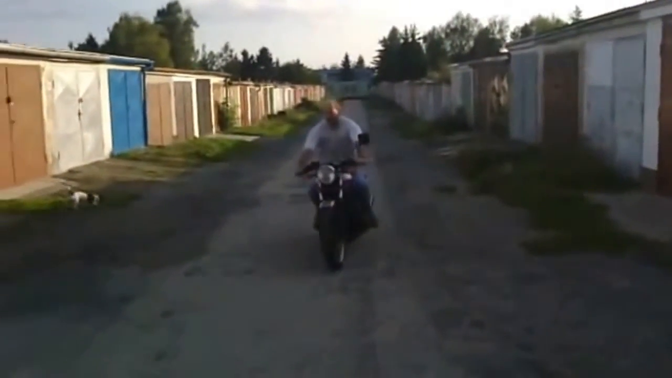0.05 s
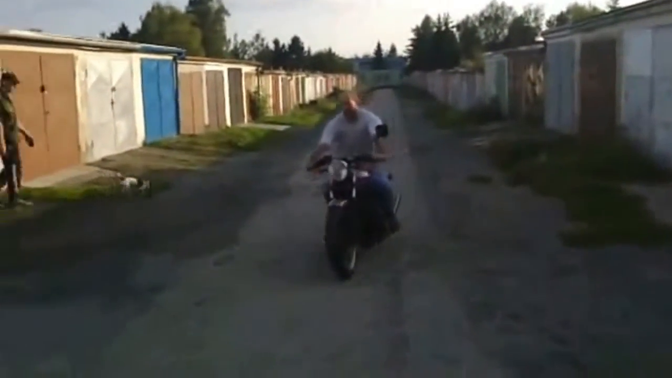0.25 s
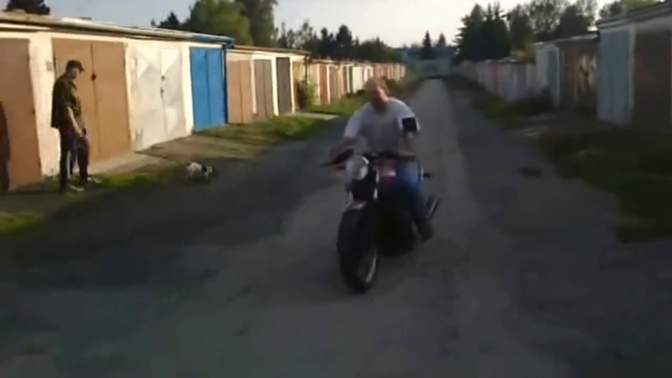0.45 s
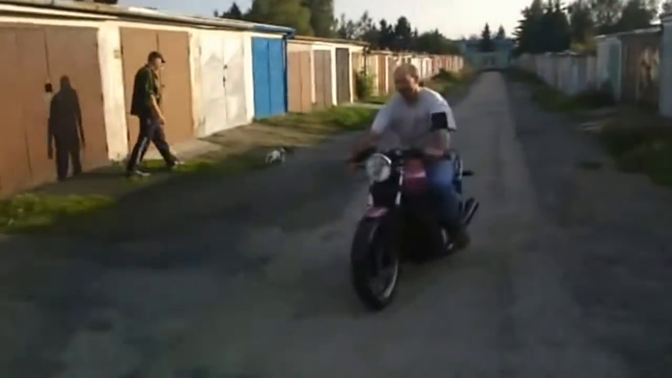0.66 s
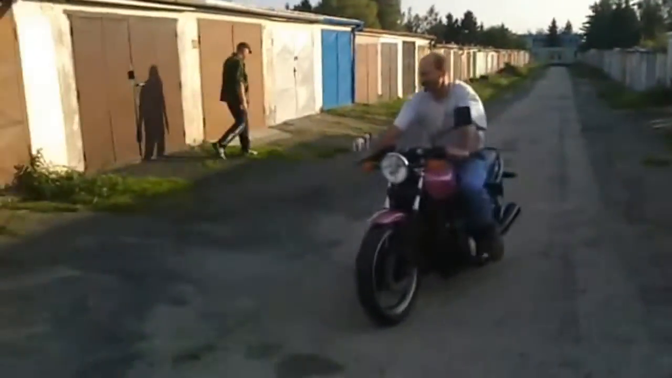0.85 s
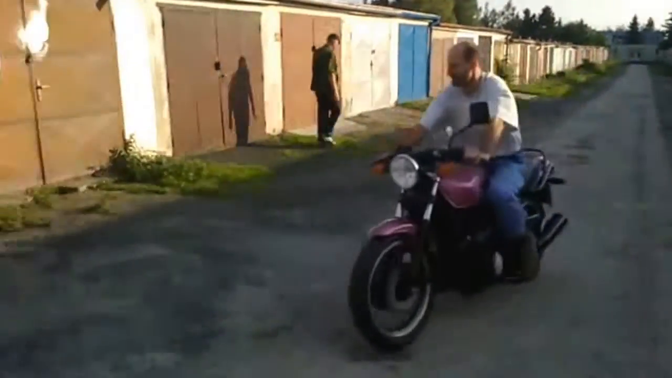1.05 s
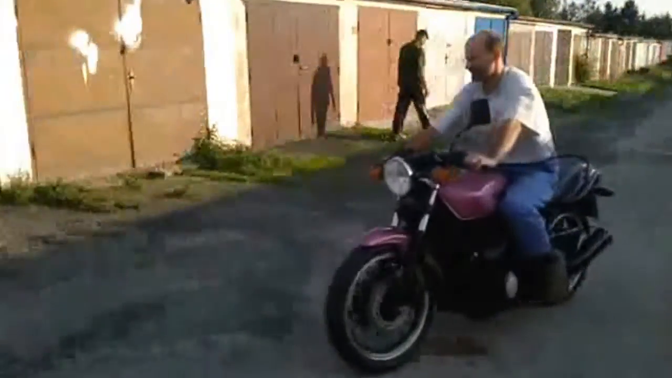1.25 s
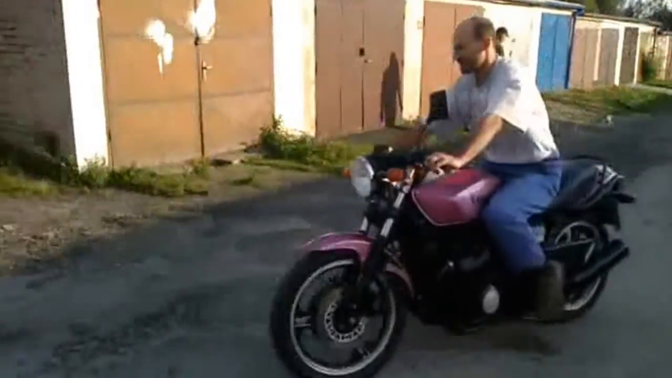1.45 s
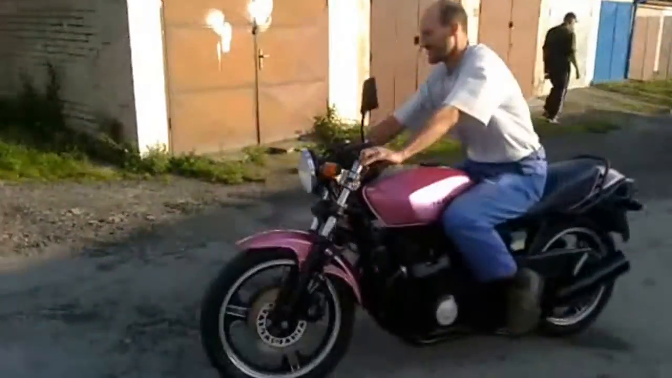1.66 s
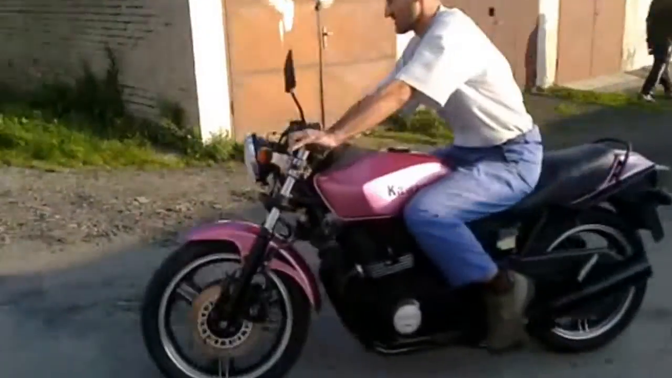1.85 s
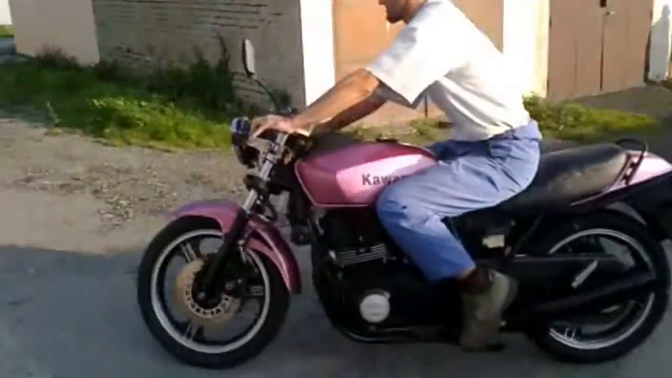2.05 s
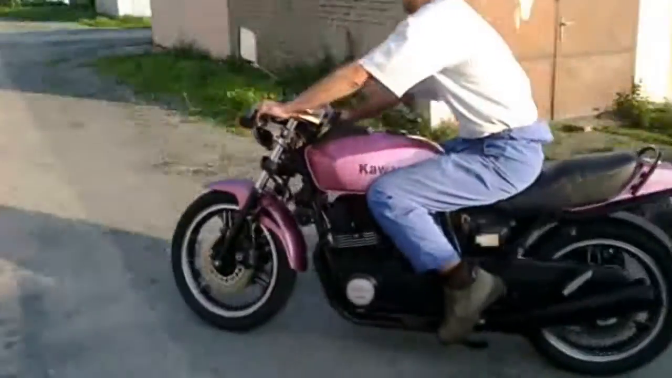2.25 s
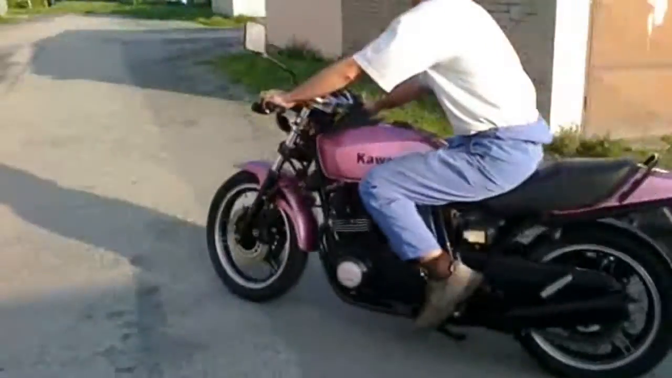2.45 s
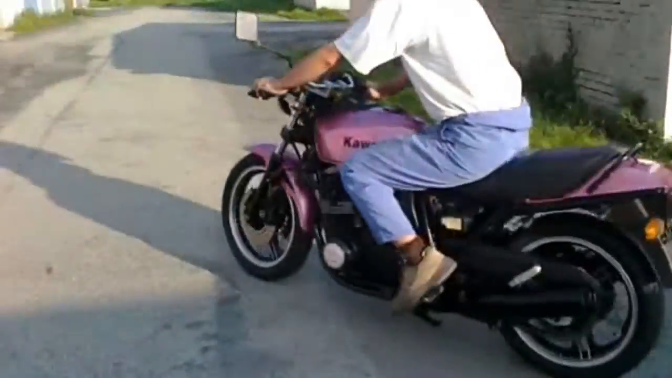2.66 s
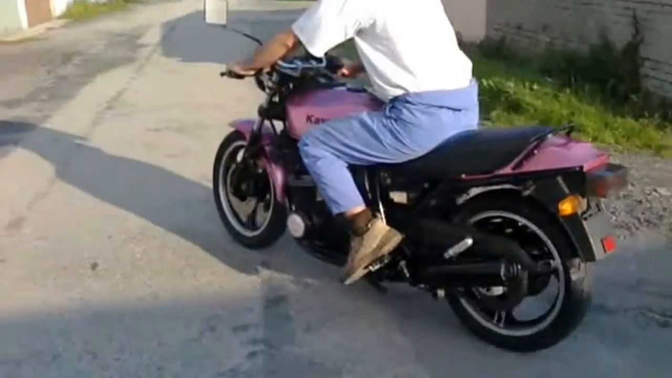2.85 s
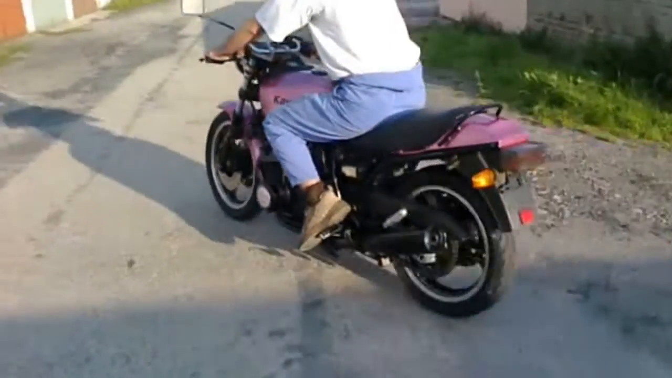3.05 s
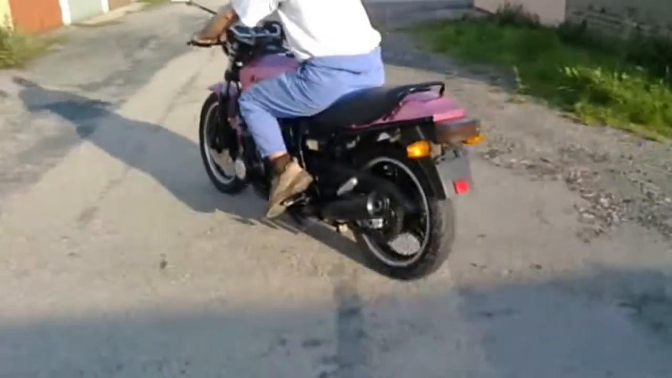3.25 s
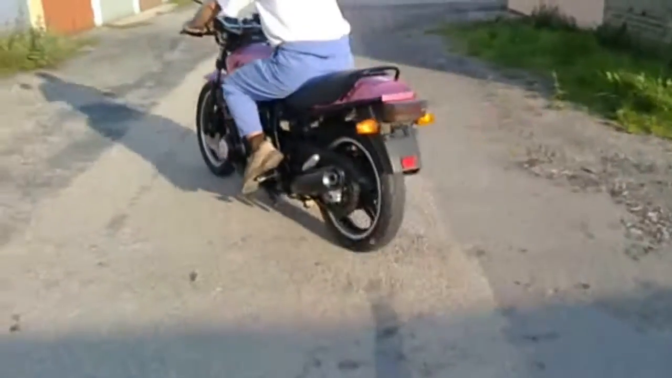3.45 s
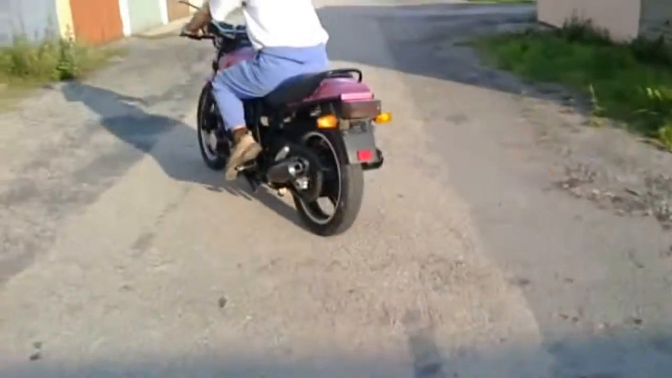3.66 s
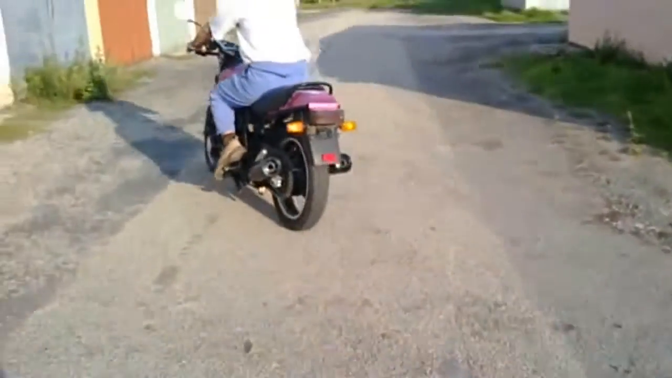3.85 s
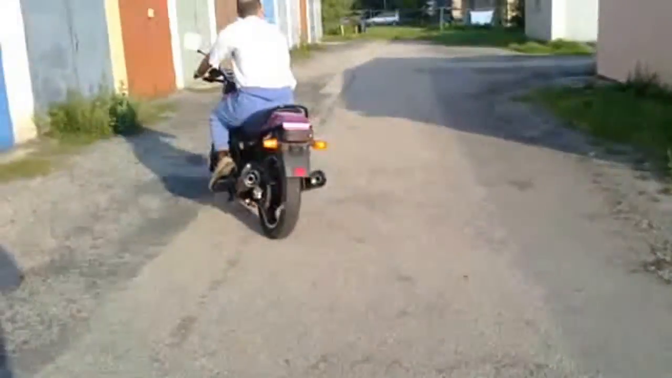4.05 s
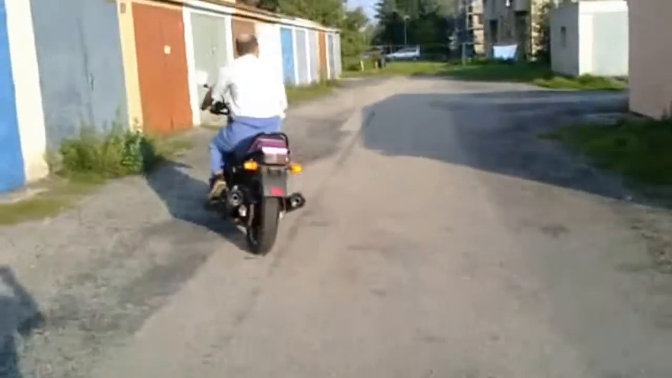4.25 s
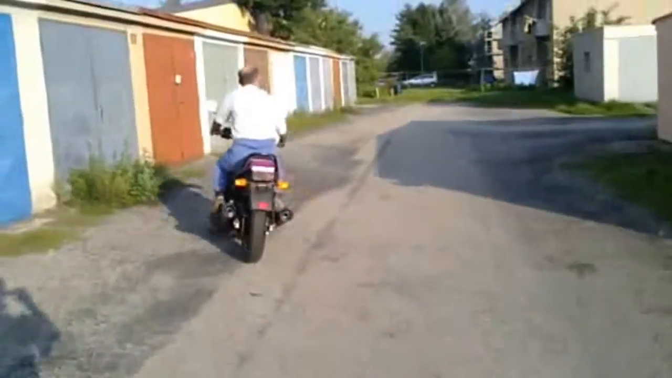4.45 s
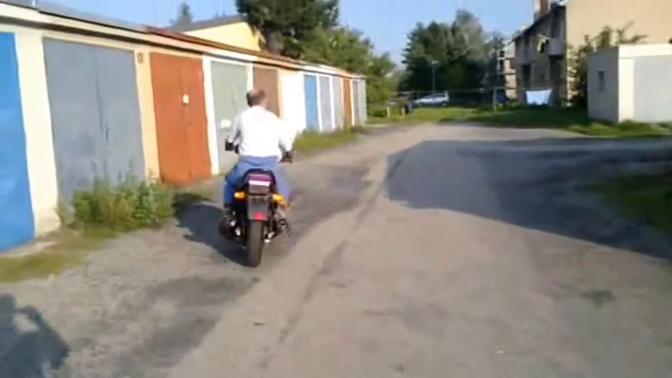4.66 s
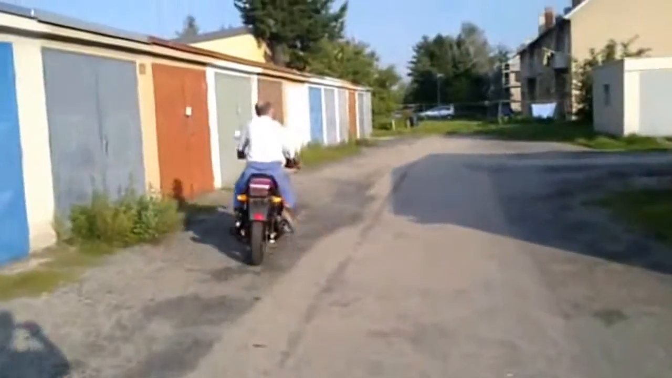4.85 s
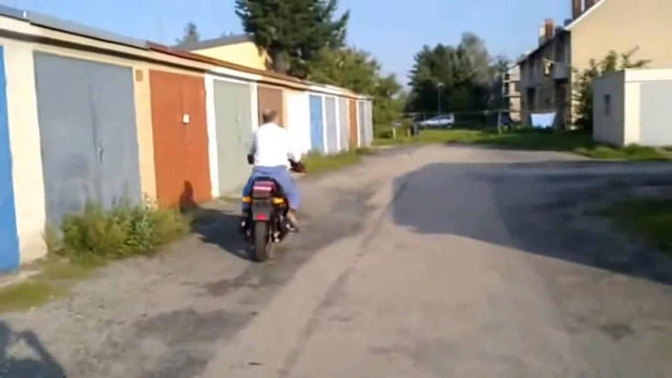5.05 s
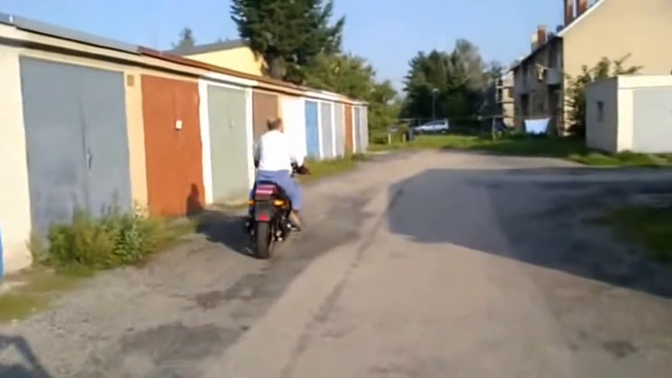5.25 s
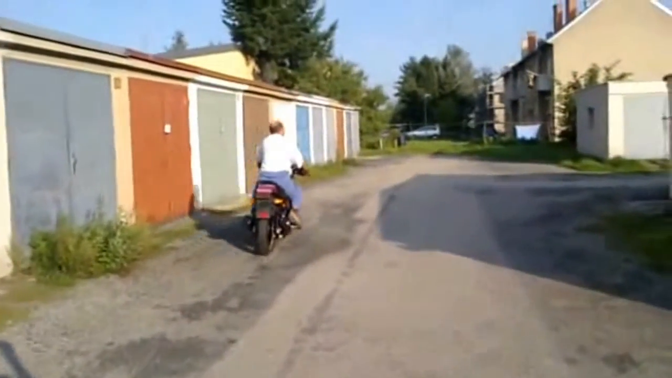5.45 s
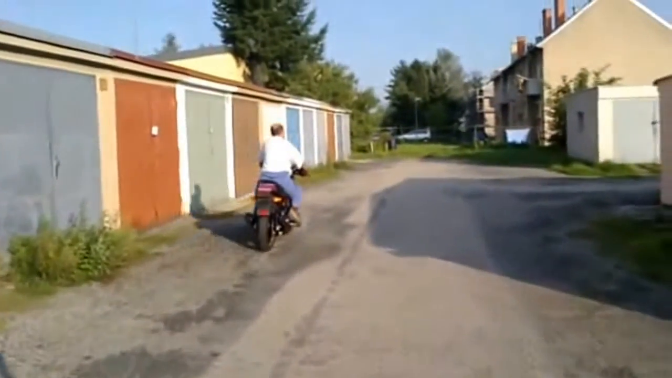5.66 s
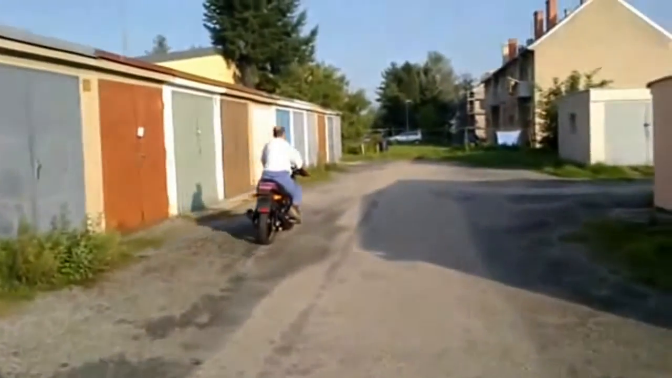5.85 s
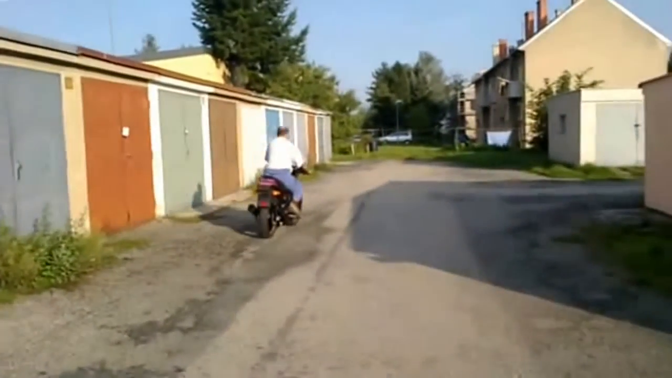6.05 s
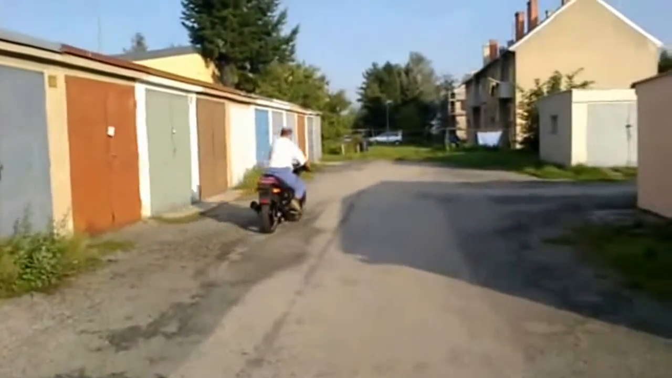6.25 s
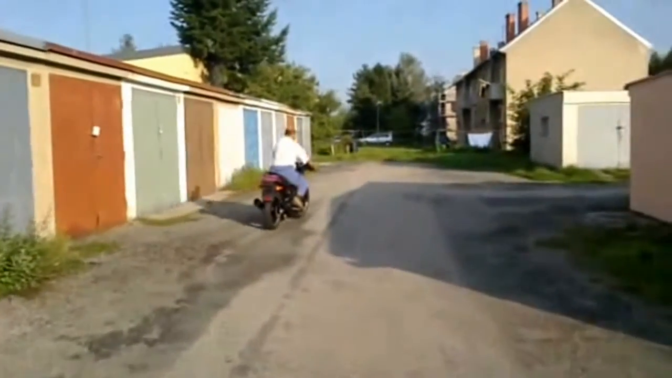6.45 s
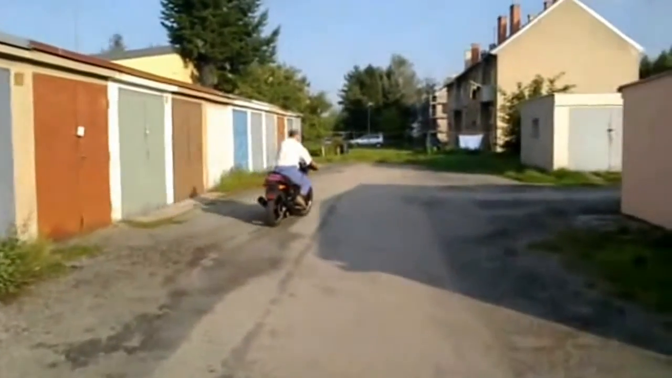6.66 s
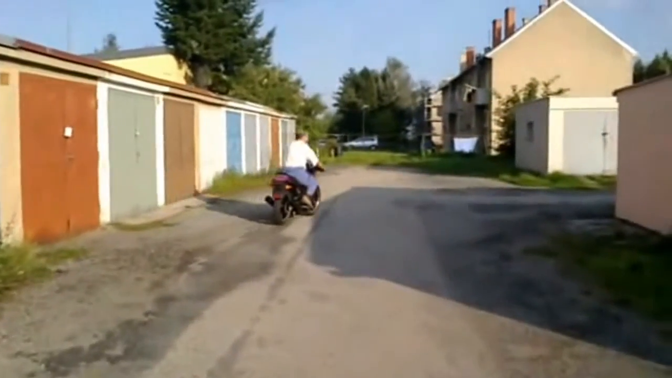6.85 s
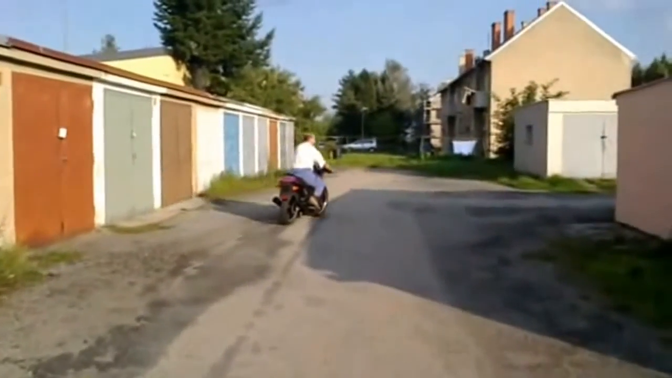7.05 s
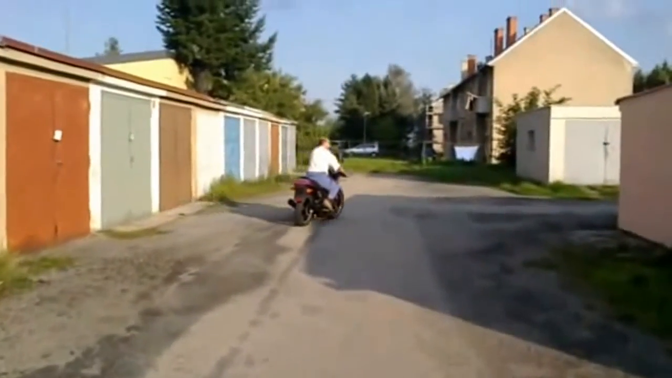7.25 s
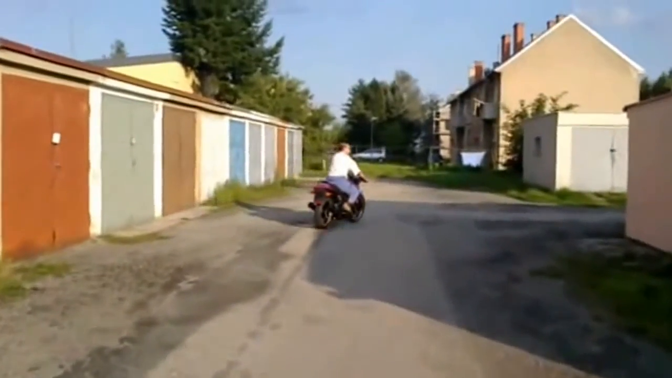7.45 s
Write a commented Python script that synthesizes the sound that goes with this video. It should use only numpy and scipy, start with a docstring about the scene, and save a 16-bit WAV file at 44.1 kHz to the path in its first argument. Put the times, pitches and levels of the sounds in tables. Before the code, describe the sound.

An old four-cylinder motorcycle runs throughout, with a deep, lumpy exhaust boom, clattering valves and a light gear whine. It approaches with quick throttle blips at the very start, at 0.5 and at 1.4 seconds, each falling back toward idle, while bits of grit snap on the ground. The highest rev rises close by from 2.1 seconds, peaking near 2.4. From about 2.9 to 4.4 seconds the engine pulls under load, climbing gently as the bike moves away slowly with a faint chain jingle. From 4.5 to 6 seconds it settles into an uneven, throbbing idle, and feet shuffle softly on gravel with small scrapes and clicks. One last blip comes at 6.2 seconds, farther off, still booming but with duller clatter, then it idles until about 7.5 seconds. Garage doors add short echoes over a faint outdoor hush.

```python
"""An old four-cylinder motorcycle rolls up a lane of garages, its idle lumpy between blips of the throttle.
Each firing booms in the exhaust while the valves clatter, the gears whine and grit snaps on the ground.
Near 3 seconds it turns close by and pulls away at walking pace, clutch slipping and chain jingling.
From 4.5 seconds it idles again and feet shuffle on gravel; one last blip comes from farther off.
The garage doors echo it all, over a faint outdoor hush."""
import sys
import numpy as np
from scipy import signal
from scipy.io import wavfile
from scipy.ndimage import map_coordinates

SR = 44100
rng = np.random.default_rng(int(sys.argv[2]) if len(sys.argv) > 2 else 0)


def dump(signal):
    """Clip the signal to [-1, 1] and save it as 16-bit WAV at the path in sys.argv[1]."""
    limited = np.clip(np.atleast_2d(signal).T, -1, 1)
    pcm = np.round(limited * 32767).astype(np.int16)
    wavfile.write(sys.argv[1], SR, pcm)


N = 331191
T = np.arange(N) / SR

# Tone colours. Each row: frequency in Hz, relative level in dB.
HUSH_TONE = [(30, -18), (100, 9), (400, -7), (1000, 1.5), (2200, -16), (7000, -45), (15000, -32)]  # distant outdoor air
GRAVEL_TONE = [(250, -8.5), (450, -3.5), (700, 3), (1200, -1.5), (1900, -1), (3000, -6), (5500, -4),
               (8000, -8.5), (11000, -12), (15700, -32)]  # gravel under a shoe
COVER_TONE = [(350, -25), (520, -8), (650, -3), (980, 0), (1150, -14), (1400, -16), (1650, -3), (2000, 0),
              (2300, -7), (2900, -1), (4500, -14)]  # how well the engine covers pass on a whine
FRONT_TONE = [(650, -24), (1100, -22), (1240, -5.5), (1900, -2.5), (2190, -5), (2560, -3.5), (3060, -3.5),
              (3500, -2), (4050, -7), (5340, -6), (6750, -13), (9530, -7), (10900, -10.5), (14600, -9.5),
              (15700, -11)]  # clatter from the front
REAR_TONE = [(650, -63), (1100, 6), (1410, 3.5), (1540, 7.5), (1720, 10.5), (2420, 0.5), (3420, 7),
             (4090, -0.5), (4620, 4), (5230, 2), (6750, -7), (9430, -11), (10500, -18), (12300, -18.5),
             (15700, -33)]  # clatter from behind
FAR_TONE = [(650, -24), (1100, -15), (1650, 6), (2000, -6), (2500, -7), (3100, 2.5), (3600, 2), (4100, -6),
            (5300, -13.5), (6700, -26), (7700, -28), (11400, -39), (15700, -48)]  # clatter from far off
RUSH_TONE = [(250, -2.5), (380, -1), (480, 0), (650, 9.5), (820, 2), (1000, 6), (1200, 3), (1500, -2),
             (2000, -9), (3300, -57)]  # gas rushing out
PIPE_TONE = [(15, -13.5), (28, -59), (38, 0), (55, 1), (75, 0.5), (100, 7.5), (120, 1), (150, -13.5),
             (190, -15), (250, -12), (300, -15.5), (370, -35), (600, -47.5), (2000, -108)]  # one exhaust pulse
# Echoes off the garage doors. Each row: delay in seconds, level in dB.
DOOR_ECHOES = [(0.012, -14), (0.024, -16.5), (.037, -23), (0.056, -21), (0.082, -21)]
# Feet on gravel. Each row: start in seconds, length in seconds, level in dB, treble cutoff in Hz.
SHUFFLES = [(4.514, 0.03, -45, 5020), (4.673, 0.19, -43.5, 9200), (4.879, .2, -42, 7000),
            (5.06, 0.11, -42, 4101), (5.185, 0.24, -40.5, 7517), (5.408, 0.14, -39.5, 6140),
            (5.538, 0.22, -42.5, 6900), (5.775, 0.16, -43, 2470), (5.962, .17, -47.5, 1670),
            (7.333, 0.12, -45.5, 895), (7.44, 0.12, -52, 1110)]
# Snaps of grit and knocks of the controls. Each row: start in seconds, relative peak in dB, pitch in Hz.
SNAPS = [(0.2282, -19, 2900), (0.828, -15.5, 3670), (0.9432, -20, 2400), (1.1918, -16, 2524),
         (1.268, -8, 1580), (2.1143, -15, 3693), (2.8789, -21, 1630), (3.4105, -18, 1932),
         (4.3665, -21.5, 1760), (4.761, -15, 2430), (5.088, -25.5, 2045), (5.5648, -24, 1868),
         (5.8137, -19, 1660), (5.837, -20, 1000), (5.8464, -12.5, 2150), (5.868, -32, 1840),
         (5.895, -42, 1530), (6.02, -26, 1107), (6.6955, -35, 2200)]
# Scrapes on grit. Each row: start in seconds, length in seconds, relative level in dB, pitch in Hz.
SCRAPES = [(1.179, 0.055, -36, 2681), (4.75, 0.031, -38.5, 3055), (5.065, 0.04, -38, 4390),
           (5.21, 0.065, -44, 2300), (5.323, 0.05, -51, 7735), (5.556, 0.042, -40.5, 6800),
           (5.587, 0.072, -40.5, 1830), (5.815, 0.02, -36, 4523), (5.842, .06, -40, 1570),
           (5.847, 0.044, -51, 3850)]
# Jingle of the drive chain. Each row: time in seconds, level in dB, pitch in Hz.
CHAIN_JINGLE = [(2.7, -100, 4700), (2.95, -59, 4790), (3.6, -44, 4730), (3.8, -39, 5320),
                (4.25, -47.5, 5340), (4.7, -100, 5234)]
# Whine of the cam chain and gears. Each row: multiple of the firing rate, relative level in dB.
WHINE_TONES = [(5.75, -3), (6.25, -2), (11.5, -1), (12.25, -2), (14, -5), (15, -4), (17, -5), (21, -7),
               (25, 1), (32.5, -4), (35, -3)]
# Ringing of the engine case and cooling fins. Each row: pitch in Hz, width in Hz, gain in dB.
METAL_RINGS = [(1750, 180, -16), (2000, 210, -8.5), (2400, 90, -11), (3700, 270, -11), (4540, 230, -25),
               (5300, 99, -14)]
# The valves' repeating round. Each entry: relative level of one tick in dB.
VALVE_ROUND_DB = [9, -4, 3, -12, 10, 3.5, 2.5, 4]
# Engine speed between blips. Each row: time in seconds, firings per second.
BASE_RATE = [(0, 41.14), (2.86, 40.95), (3.072, 49.43), (3.23, 54.64), (3.354, 51.6), (3.5, 50.7),
             (3.724, 59.18), (4.31, 63.34), (4.5, 51.11), (4.92, 39.03), (5.6, 35), (5.85, 44.06),
             (6.9, 45.92), (7.17, 35.21), (7.51, 33.84)]
# Throttle blips. Each row: start in seconds, rise in seconds, top firings per second,
# coasting time in seconds, opening from 0 to 1.
BLIPS = [(-.153, 0.17, 62.44, 0.27, 1), (.46, .16, 96.95, 0.29, 0.73), (1.345, 0.17, 80.1, .28, 0.83),
         (1.85, .12, 53.06, .2, 0.3), (2.065, .295, 121.9, .195, 0.55), (6.213, 0.17, 92.65, .22, 1)]
# The idle throbs when cylinders catch well and dips when they miss.
# Each row: time in seconds, change of the boom in dB.
THROBS = [(.148, -1.5), (.273, 4.5), (.42, -6), (.958, 1), (1.135, 6), (1.288, 8), (1.805, 2), (1.92, 8),
          (2.765, -8), (2.81, 6), (4.389, -2), (4.475, 9), (4.595, 12.5), (4.738, 7.5), (4.82, 6.5),
          (4.915, 10), (5.02, 8.5), (5.145, 7.5), (5.275, 12.5), (5.348, 10), (5.613, 8), (5.792, 6),
          (6.011, 3), (6.09, -8), (6.718, 7.5), (6.803, 7), (6.911, 3.5), (7.05, -4), (7.164, 15),
          (7.264, 9.5), (7.393, 9.5)]
# Cylinders in firing order. Each row: extra strength in dB, pipe delay in seconds, both at their most.
CYLINDERS = [(0.5, 0.00035), (1.75, 0.000057), (1, 0.0005), (1.1, 0.00079)]
# How well each part is heard as the bike nears, turns and leaves.
# Each row: time in seconds, then gains in dB for the silencer, the pipe mouths and the engine.
RIDE_PAST = [(0, -4, -0.5, -7), (.45, -0.5, 1, -0.5), (.7, -1.5, -1, -5.5), (1.1, -1, -1.5, -2.5),
             (1.6, -0.5, 0.2, -1), (2.35, 2.5, 3.5, 2.5), (2.75, -1, -2, -0.5), (3.03, 1.5, -2, 2),
             (3.3, -1, -2.5, -4), (3.6, 1, 0, -2.5), (4.1, -5, -0.5, -5), (4.35, -9, 0, -4),
             (4.6, -4.5, -3, -5), (6.2, 1, 4, -11.5), (6.8, -4, -1.5, -18.5), (7.51, 4, 5, -16.5)]
# The airbox (air intake) fades as the bike turns. Each row: time in seconds, gain in dB.
AIRBOX_FADE = [(.7, -4), (2.2, -14)]
# Loudness rules. Each lists, in dB: base level, then the change at full throttle,
# per doubling of engine speed, under load and from behind.
CLATTER = (-39.5, 9.5, 8, 4, -2.5)  # valves and gears
SIZZLE = (-49, 14, 4.5, 5.5, -2)  # their top treble
HONK = (-57.5, 14, 17, 1, 1.5)  # airbox
RUSH = (-52.5, 9.5, 7.5, 4, 1)  # escaping gas
THUMP = (-30.5, 7, 8.5, 7, -2)  # deepest part of the exhaust
BOOM = (-26, 7.5, 6.5, 5.5, 0)  # silencer
BARK = (-35.5, 13.5, 8.5, 6, -6)  # pipe mouths

IDLE_HZ = 41.68  # at this firing rate and below, the burn is most uneven


def amp(db):
    """Turns decibels into a gain."""
    return 10 ** (np.asarray(db) / 20)


def unit(x):
    """Scales a signal to an average power of 1."""
    return x / np.sqrt(np.mean(x ** 2) + 1e-20)


def curves(rows):
    """Draws each column of a timed table as one value per sample."""
    times, *columns = np.transpose(rows)
    return [np.interp(T, times, column) for column in columns]


def add(mix, start, sound):
    """Mixes a sound in at a start time in seconds."""
    part = mix[max(round(start * SR), 0):][:len(sound)]
    part += sound[:len(part)]


def band(x, low_hz, high_hz, order=3):
    """Keeps the sound between two frequencies, without delaying it."""
    sos = signal.butter(order, [low_hz, min(high_hz, SR / 2 - 100)], "band", fs=SR, output="sos")
    return signal.sosfiltfilt(sos, x)


def colour(x, tone, size=8192):
    """Applies a tone colour so that ringing follows a click and never comes before it."""
    hz, db = np.transpose(tone)
    bin_hz = abs(np.fft.fftfreq(size, 1 / SR))
    log_gain = np.log(amp(np.interp(np.log(bin_hz + 1), np.log(hz + 1), np.maximum(db, -100))))
    response = np.fft.ifft(np.exp(np.conj(signal.hilbert(log_gain)))).real[:size // 2]
    return signal.oaconvolve(x, response)[:N]


def ring(x, hz, width_hz):
    """Rings at one pitch; a narrower width rings longer."""
    return signal.lfilter(*signal.iirpeak(hz, hz / width_hz, SR), x)


def at_level(x, db, seconds):
    """Sets the slow level of a sound and keeps its quicker beats."""
    window = np.hanning(int(seconds * SR))
    power = signal.fftconvolve(x ** 2, window, "same") / signal.fftconvolve(np.ones(N), window, "same")
    return x * amp(db) / np.sqrt(abs(power) + 1e-16)


def clicks(at, db):
    """Places clicks at the given samples."""
    return np.bincount(np.clip(at, 0, N - 1).astype(int), amp(db), N)


def random_clicks(per_s):
    """Scatters clicks of random size at random times."""
    return (rng.random(N) < per_s / SR) * rng.standard_normal(N)


def puffs(pulses, decay_s):
    """Each click lets out a dying burst of noise."""
    return signal.lfilter([1], [1, -np.exp(-1 / (decay_s * SR))], pulses) * rng.standard_normal(N)


def outdoor_hush(level_db=-54):
    """A faint, steady noise from far away."""
    return amp(level_db) * unit(colour(rng.standard_normal(N), HUSH_TONE))


def lane_echoes(x, tail_db=-14, fade_s=0.82):
    """Two rows of doors throw back a few echoes and a short, blurred tail."""
    t = T[:SR // 2]
    tail = rng.standard_normal(len(t)) * amp(-60 * t / fade_s) * (t > .012)
    response = amp(tail_db) * unit(tail) / np.sqrt(len(t))
    for delay, db in DOOR_ECHOES:
        response[int(delay * SR)] += amp(db)
    return signal.fftconvolve(band(x, 89, 9000, order=1), response)[:N]


def shuffling_feet(scatter_db=3):
    """A sole drags over gravel: a swell of tiny cracks, duller on packed dirt."""
    sizes = amp(scatter_db * np.minimum(rng.exponential(1, N), 4))
    crunch = colour(sizes * random_clicks(per_s=5000), GRAVEL_TONE)
    out = np.zeros(N)
    for start, length, db, cutoff_hz in SHUFFLES:
        piece = crunch[int(start * SR):][:int(length * SR)]
        drag = signal.lfilter(*signal.butter(2, cutoff_hz, fs=SR), piece)
        add(out, start, amp(db) * unit(drag * signal.windows.tukey(len(drag), 0.4)))
    return out


def grit_snaps(boost_db=2, crack_s=0.0016, tail_s=0.016):
    """Each snap is one short crack with a faint tail."""
    out, t = np.zeros(N), T[:2048]
    body_filter = signal.butter(3, [1000, 6000], "band", fs=SR, output="sos")
    for start, db, hz in SNAPS:
        crack = rng.standard_normal(len(t)) * (np.exp(-t / crack_s) + amp(-16) * np.exp(-t / tail_s))
        crack[1] += amp(15)  # the first contact is one sharp click
        body = signal.sosfilt(body_filter, ring(crack, hz, 1.4 * hz))
        near = np.interp(start, [.9, 1.3, 2.5, 4], [.05, .7, .7, 0])
        snap = body + amp(-19) * near * np.gradient(crack)  # only near snaps keep a bright edge
        add(out, start, amp(db + boost_db) * snap / abs(snap).max())
    return out


def grit_scrapes(grains_per_s=3500, trim_db=-1):
    """Each scrape is a clump of tiny cracks."""
    out = np.zeros(N)
    for start, length, db, hz in SCRAPES:
        count, width_hz = int(length * SR), 0.41 * hz
        grains = rng.standard_normal(count) * (rng.random(count) < grains_per_s / SR)
        grains *= signal.windows.tukey(count, .5)
        add(out, start, amp(db + trim_db) * unit(ring(ring(grains, hz, width_hz), hz, width_hz)))
    return out


def drive_chain(width_hz=260):
    """Links clink onto the toothed wheel, each ringing briefly."""
    db, hz = curves(CHAIN_JINGLE)
    hits = random_clicks(per_s=160)
    decay = np.exp(-np.pi * width_hz / SR)
    gliding_tone = np.exp(2j * np.pi * np.cumsum(hz) / SR)
    envelope = signal.lfilter([1], np.poly([decay, decay]), hits / gliding_tone)
    return unit((gliding_tone * envelope).real) * amp(db)


def firing_rate(step=64, coast_shape=1.4):
    """Firings per second: each blip spins the engine up, then friction and pumping slow it."""
    t = T[::step]
    hz = np.interp(t, *np.transpose(BASE_RATE))
    for start, rise, top_hz, coast, _ in BLIPS:
        spin_up = np.sin(np.pi / 2 * np.clip((t - start) / rise, 0, 1)) ** 2
        slow_down = np.exp(-(np.maximum(t - start - rise, 0) / coast) ** coast_shape)
        hz = hz + (top_hz - hz) * spin_up * slow_down
    return np.repeat(hz, step)[:N]


def throttle(step=64, lead_s=0.01, open_s=0.042, hold_share=0.54, shut_s=0.081):
    """Opening from 0 to 1: it opens just before the revs climb and starts to shut before they peak."""
    t, total = T[::step], 0
    for start, rise, _, _, opening in BLIPS:
        opens = np.clip((t - start + lead_s) / open_s, 0, 1)
        shuts = np.exp(-np.maximum(t - start - hold_share * rise, 0) / shut_s)
        total += opening * opens * shuts
    return np.interp(T, t, total)


def clutch_load(start_s=2.876, grip_s=0.075, hold_s=1.32, release_s=0.13):
    """Load from 0 to 1: the clutch takes hold to pull away, then lets go."""
    return np.interp(T, np.cumsum([start_s, grip_s, hold_s, release_s]), [0, 1, 1, 0])


def unevenness():
    """How unevenly the fuel burns, from 0 to 1: speed and load both steady it."""
    return np.minimum(IDLE_HZ / firing_rate(), 1) ** 1.41 * (1 - 0.7 * clutch_load())


def turned():
    """0 while the bike faces the listener, 1 once it shows its tail."""
    return np.interp(T, [2.5, 3], [0, 1])


def loudness(rule):
    """Level in dB of one part, from throttle, revs, load and heading."""
    base_db, throttle_db, revs_db, load_db, behind_db = rule
    return (base_db + throttle_db * throttle() + revs_db * np.log2(firing_rate() / IDLE_HZ)
            + load_db * clutch_load() + behind_db * turned())


def firing_count():
    """A smooth count of firings so far, two to each turn of the crankshaft."""
    return np.cumsum(firing_rate()) / SR - .01


def beats(per_firing):
    """Sample positions of a beat that keeps step with the engine."""
    return np.flatnonzero(np.diff(np.floor(firing_count() * per_firing)))


def cycle_buzz(size=1024):
    """A rough pattern repeats with every engine cycle, so its buzz glides with the revs."""
    position = firing_count() / len(CYLINDERS) % 1 * size
    return unit(map_coordinates(rng.standard_normal(size), [position], order=3, mode="grid-wrap"))


def gear_whine(waver=.85, trim_db=-4):
    """Meshing teeth sing, wavering with the slack and flaring at pitches where the covers ring."""
    phase = 2 * np.pi * firing_count()
    times = np.arange(0, T[-1] + 1, .025)
    whine = np.zeros(N)
    for multiple, db in WHINE_TONES:
        slack = np.interp(T, times, rng.standard_normal(len(times)))
        whine += amp(db) * np.cos(multiple * phase + waver * slack)
    _, _, engine_db = curves(RIDE_PAST)
    return colour(unit(whine), COVER_TONE) * amp(engine_db + loudness(CLATTER) + trim_db)


def valve_clatter(jitter_s=0.00069, scatter_db=3.3):
    """Valves tick over the whirr of chains and gears; the tone changes as the bike turns and leaves."""
    at = beats(per_firing=2)
    size, lateness = rng.standard_normal((len(at), 2)).T
    tick_db = np.resize(VALVE_ROUND_DB, len(at)) + scatter_db * np.tanh(size)
    ticks = puffs(clicks(at + jitter_s * SR * lateness, tick_db), decay_s=0.0034)
    rattle = amp(-7) * unit(random_clicks(per_s=700))
    whirr = rng.standard_normal(N)
    buzz = amp(-2) * unit(firing_rate()) * cycle_buzz()  # gears sing out as the revs rise
    shaking = unit(ticks) + rattle + whirr + buzz
    metal = shaking + sum(amp(db) * ring(shaking, hz, width) for hz, width, db in METAL_RINGS)
    behind, far = turned(), np.interp(T, [5.7, 6], [0, 1])
    sound = ((1 - behind) * colour(metal, FRONT_TONE) + (behind - far) * colour(metal, REAR_TONE)
             + far * colour(metal, FAR_TONE))
    dullness = np.interp(T, [.4, .55], [.6, 0])  # the top fizz is muted until the blip at half a second
    sound -= dullness * band(sound, 9800, 18000)
    _, _, engine_db = curves(RIDE_PAST)
    return (at_level(band(sound, 1190, 7880, order=4), engine_db + loudness(CLATTER), 0.32)
            + at_level(band(sound, 6680, 26500, order=4), engine_db + loudness(SIZZLE), 0.39))


def gas_rasp(pulses, honk_hz=465, honk_width_hz=240):
    """Gas tears out of the silencer with every pulse; the airbox honks at high revs."""
    bursts = unit(puffs(pulses, decay_s=0.0097))
    flow = amp(-4) * rng.standard_normal(N)
    gas = bursts + amp(-6) * unit(pulses) + flow + cycle_buzz()
    airbox = ring(ring(gas, honk_hz, honk_width_hz), honk_hz, honk_width_hz)
    honk = at_level(airbox, loudness(HONK) + curves(AIRBOX_FADE)[0], 0.26)
    rush = at_level(colour(gas, RUSH_TONE), loudness(RUSH), 0.41)
    _, mouths_db, _ = curves(RIDE_PAST)
    return amp(mouths_db) * (rush + honk)


def firings(scatter_db=2, jitter_share=.1, lope_db=2):
    """Four unequal cylinders fire in turn; at idle they burn unevenly and come early or late."""
    at = beats(per_firing=1)
    uneven = unevenness()[at]
    strength, lateness = rng.standard_normal((len(at), 2)).T
    cylinder_db, pipe_delay = np.resize(CYLINDERS, (len(at), 2)).T
    lope = np.resize([1, 1, -1, -1], len(at))  # two strong, two weak
    burn_db = uneven * (lope_db * lope + scatter_db * np.tanh(strength))
    stumble_s = jitter_share * uneven ** 2 * lateness / firing_rate()[at]
    imbalance = np.minimum(.5 + 2 * uneven, 1)  # load evens the cylinders out
    return clicks(at + SR * (imbalance * pipe_delay + stumble_s), imbalance * cylinder_db + burn_db)


def idle_throbs(step=64, throb_s=0.028, sag_db=-4):
    """Swell of the idle in dB: it sags between the throbs."""
    t = T[::step]
    surges = sum(db * np.exp(-((t - peak_s) / throb_s) ** 2) for peak_s, db in THROBS)
    return sag_db * unevenness() + np.interp(T, t, surges)


def exhaust(pulses, boom_hz=103, boom_width_hz=20, thump_top_hz=76):
    """Pulses ring the pipe: a deep thump, the silencer's boom and a bark that grows with throttle."""
    hz, uneven, swell_db = firing_rate(), unevenness(), idle_throbs()
    silencer_db, mouths_db, _ = curves(RIDE_PAST)
    turbulence = amp(-31) * puffs(pulses, decay_s=0.015) * (0.26 + uneven)
    gas = colour(pulses + turbulence, PIPE_TONE)
    # the silencer keeps ringing between the slow firings of the idle
    chamber = gas + amp(3) * uneven * ring(gas, boom_hz, boom_width_hz)
    # the boom peaks when the firing rate or its double meets the silencer's note
    in_tune = sum(np.exp(-((k * hz - boom_hz) / boom_width_hz) ** 2) for k in (1, 2))
    boom_db = silencer_db + loudness(BOOM) + 3 * in_tune + swell_db
    # the thump fades as the firing rate climbs out of the deep bass
    octaves_above = np.maximum(np.log2(hz / thump_top_hz), 0)
    thump_db = loudness(THUMP) - 27 * octaves_above + 0.11 * swell_db
    bark_db = mouths_db + loudness(BARK) + 0.71 * swell_db
    return (at_level(band(gas, 27, thump_top_hz), thump_db, 0.27)
            + at_level(band(chamber, thump_top_hz, 149), boom_db, 0.13)
            + at_level(band(gas, 141.7, 426), bark_db, 0.23))


def scene():
    """Mixes the bike, the ground, their echoes and the hush into one channel."""
    pulses = firings()
    bike = exhaust(pulses) + gas_rasp(pulses) + valve_clatter() + gear_whine() + drive_chain()
    direct = bike + grit_snaps() + grit_scrapes() + shuffling_feet()
    return (direct + lane_echoes(direct) + outdoor_hush())[None]


def record(dry):
    """Cuts the highest treble, above 15800 Hz."""
    low_pass = signal.firwin(511, 15800, window=("kaiser", 9), fs=SR)
    return signal.oaconvolve(dry, low_pass[None], "same")


dry = scene()
out = record(dry)
dump(out)
```